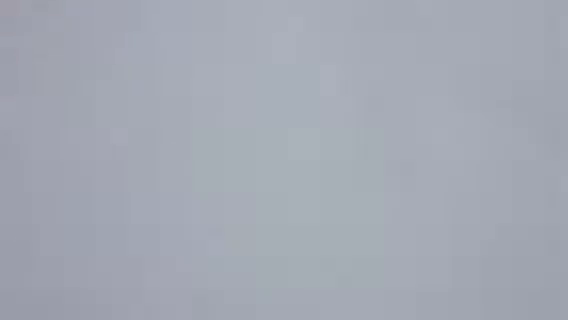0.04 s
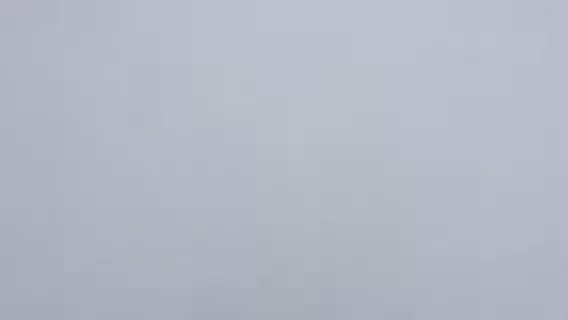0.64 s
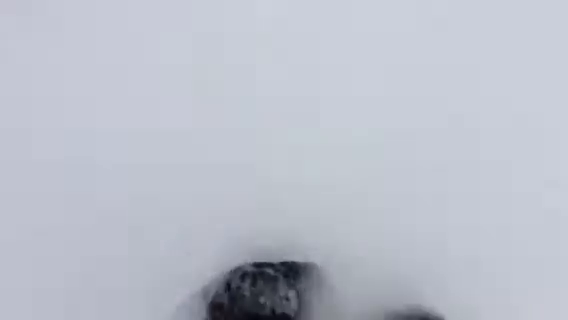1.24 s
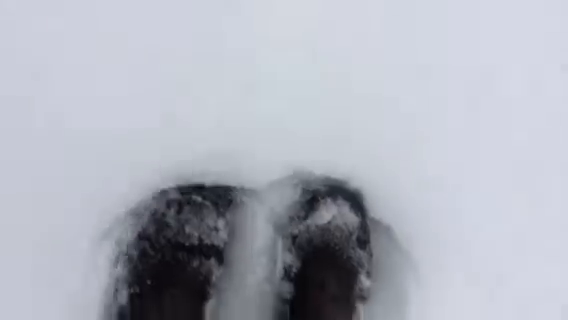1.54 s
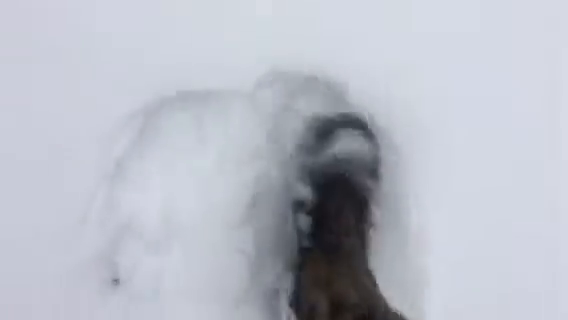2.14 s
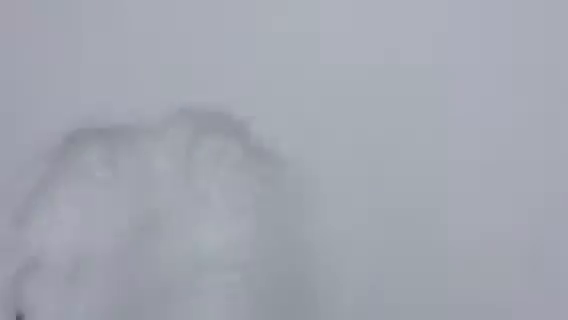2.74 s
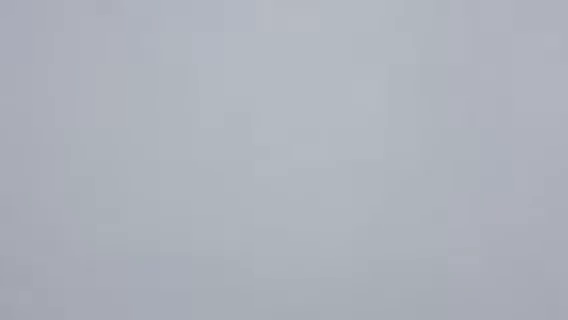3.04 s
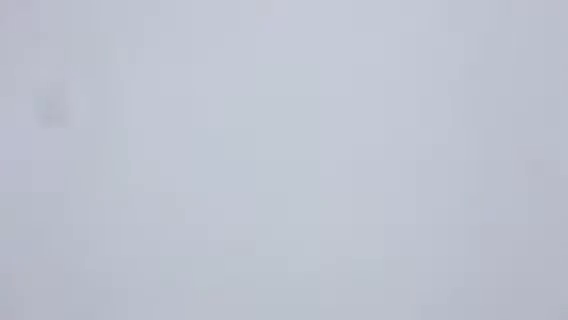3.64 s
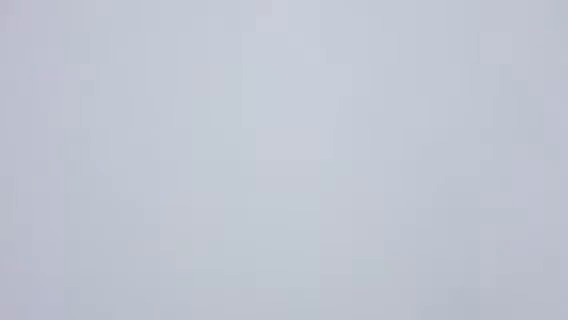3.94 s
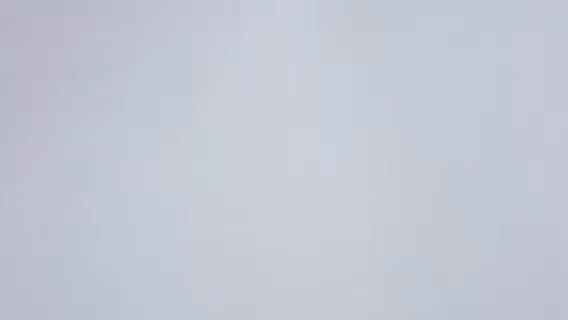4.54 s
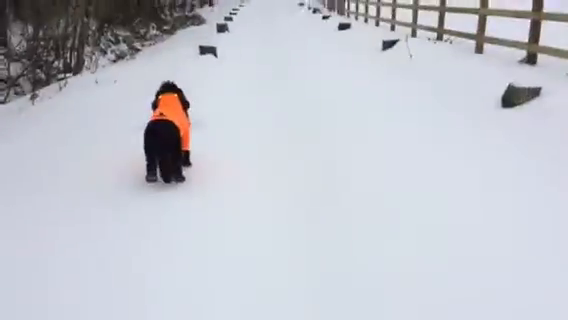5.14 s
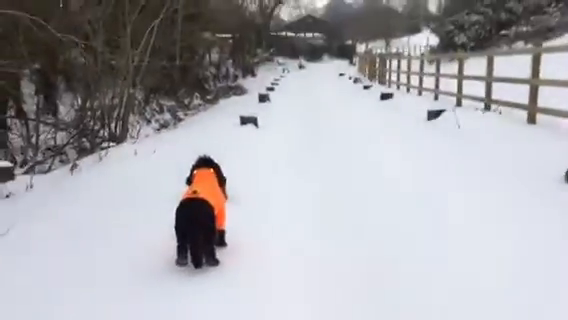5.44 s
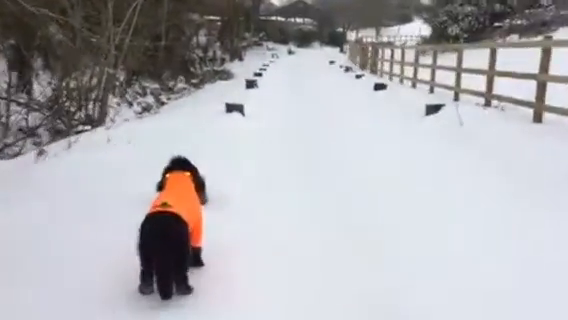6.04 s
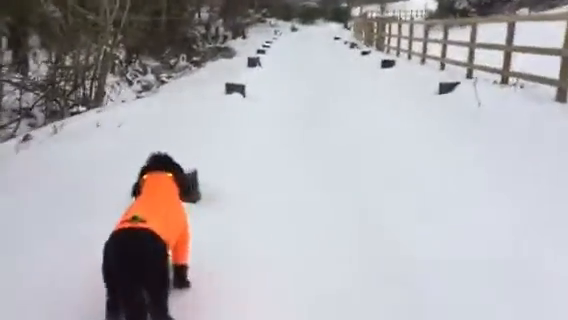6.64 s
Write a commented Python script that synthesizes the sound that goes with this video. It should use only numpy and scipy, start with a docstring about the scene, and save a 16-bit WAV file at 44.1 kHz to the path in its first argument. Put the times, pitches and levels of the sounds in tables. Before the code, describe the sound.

Close, uneven footsteps crunch through an icy snow crust, roughly one every two thirds of a second. The snow creaks and packs with low thuds, while small scuffs and sharp ticks fill the gaps. The handheld microphone rumbles softly and picks up muffled bumps, more so from the middle on. The open air is quiet and has no echo, with barely audible birds far away later on.

```python
"""Boots in crusted snow

A walker in open snow, heard close up from a phone held above the boots. Under each step the crust gives
way in bursts of tiny fractures while the snow below creaks and packs with a dull thud. Between steps
crumbs snap and slide, the handheld phone rumbles softly, and far birds whistle faintly."""
import sys
import numpy as np
from scipy import signal
from scipy.fft import rfft, irfft
from scipy.io import wavfile
from scipy.ndimage import uniform_filter1d

SR = 44100
rng = np.random.default_rng(int(sys.argv[2]) if len(sys.argv) > 2 else 0)


def transcribe(u):
    """Save the signal u as a 16-bit wav file named by the first command-line argument.

    u: samples, shape (n,) or (channels, n), limited to [-1, 1]; the rate is SR.
    q: integer samples, one column per channel.
    """
    v = np.clip(np.atleast_2d(u).T, -1, 1)
    q = np.round(v * 32767).astype(np.int16)
    wavfile.write(sys.argv[1], SR, q)


N = 299880


def undb(db):
    """Decibels to gain."""
    return 10 ** (np.asarray(db) / 20)


def curve(table):
    """A table of times and values, interpolated at every sample."""
    return np.interp(np.arange(N) / SR, *np.transpose(table))


def add(track, start_s, sound):
    """Mix a sound into a track."""
    i = int(np.clip(start_s * SR, 0, N - 1))
    track[i:i + len(sound)] += sound[:N - i]


def wander(rate_hz):
    """Random levels, each held for one period, then smoothed twice; spread near 1."""
    hold = int(SR / rate_hz)
    levels = np.repeat(rng.standard_normal(N // hold + 1), hold)
    return 1.3 * uniform_filter1d(uniform_filter1d(levels, hold), hold)[:N]


def envelope(t, attack_s, hold_s, release_s):
    """Rise, hold and die away."""
    rise = np.clip(t / max(attack_s, 1 / SR), 0, 1)
    return rise * np.exp(-np.maximum(t - attack_s - hold_s, 0) / release_s)


def match_energy(x, shape):
    """Scale a sound to carry the energy of an envelope."""
    return x * np.sqrt(np.sum(shape ** 2) / np.sum(x ** 2))


def colour(x, spectrum):
    """Minimum-phase filter through (Hz, dB) points; white noise keeps its level."""
    size = 8192
    hz, db = np.transpose(spectrum)
    bins_hz = np.arange(size // 2 + 1) * SR / size
    gain = undb(np.interp(np.log(bins_hz + 1), np.log(hz), db))
    cepstrum = irfft(np.log(gain / np.sqrt(np.mean(gain ** 2))))
    cepstrum[1:size // 2] *= 2
    cepstrum[size // 2 + 1:] = 0
    return signal.oaconvolve(x, irfft(np.exp(rfft(cepstrum))))[:N]


# Outdoor air all around the microphone: frequency_hz, gain_db
AIR_SPECTRUM = [(30, -1), (200, 5), (700, 9.5), (1500, 3), (4000, -2), (7000, -9), (9500, -16),
                (11000, -34.5), (16000, -12.5)]


def air():
    """A faint, steady hush over the snow."""
    return undb(-66) * colour(rng.standard_normal(N), AIR_SPECTRUM)


# Birds far from the microphone: start_s, length_s, start_hz, end_hz, level_db
BIRD_CALLS = [(3.74, .14, 2000, 1870, -67), (5.04, .12, 3200, 2950, -68), (5.54, .07, 7150, 6850, -67),
              (5.62, .06, 6700, 6450, -65), (5.74, .06, 5450, 5100, -57), (5.785, .09, 5080, 5050, -61),
              (5.815, .06, 5750, 5600, -67)]


def birds():
    """Thin falling whistles, wavering on their way through the trees."""
    out = np.zeros(N)
    for start_s, length_s, start_hz, end_hz, level_db in BIRD_CALLS:
        hz = np.linspace(start_hz, end_hz, int(length_s * SR))
        hz *= 1 + 0.07 * uniform_filter1d(rng.standard_normal(len(hz)), size=100)
        whistle = np.sin(2 * np.pi * np.cumsum(hz) / SR)
        add(out, start_s, undb(level_db) * np.hanning(len(hz)) * whistle)
    return out


def thud(t, hz, shape, roughness):
    """A soft impact, as of snow packing in uneven jerks: low noise and a tone that falls through hz."""
    band = signal.butter(3, [.42 * hz, 1.7 * hz], "band", fs=SR, output="sos")
    noise = signal.sosfilt(band, rng.standard_normal(len(t)))
    jerks = match_energy(noise * shape, shape) / np.sqrt(2)
    sagging_hz = hz * (0.8135 + 0.55 * np.exp(-t / 0.011))  # more of the sole bears on the snow
    tone = shape * np.sin(2 * np.pi * np.cumsum(sagging_hz) / SR)
    return (roughness * jerks - tone) / np.sqrt(1 + roughness ** 2)


# Soft buffeting right at the handheld microphone: time_s, level_db
BUFFET_LEVELS = [(0, -61), (.13, -37.5), (.4, -42.5), (.6, -57.5), (1.0, -45.5), (1.3, -46), (1.92, -54.5),
                 (2.08, -33), (2.2, -47), (2.6, -74), (3.1, -38), (3.37, -55), (3.7, -35), (4.45, -38.5),
                 (5.2, -43.5), (6.25, -48), (6.42, -46), (6.8, -42)]
# The bass-heavy tone of that buffeting: frequency_hz, gain_db
BUFFET_SPECTRUM = [(20, -50.5), (35, -7), (55, 2.5), (80, 5.5), (130, -7), (220, -17), (350, -25),
                   (600, -40.5), (1200, -64.5)]
# Muffled bumps of boot and clothing, close by: start_s, level_db, pitch_hz
BODY_BUMPS = [(1.033, -33, 170), (1.18, -26.5, 98), (1.654, -40, 164), (2.098, -30.5, 205),
              (2.267, -30, 252), (2.33, -34.5, 342), (3.01, -25, 71), (3.147, -30, 126), (3.21, -22, 89),
              (3.237, -22.5, 135), (3.611, -20, 157), (3.683, -28.5, 145), (3.725, -39.5, 78.6),
              (3.784, -21.5, 119), (3.963, -21, 158), (4.243, -19, 137), (4.294, -22, 149),
              (4.492, -27, 158), (4.666, -23, 251), (5.036, -26, 80), (5.09, -31.5, 69.5),
              (0.418, -38, 67.5), (0.71, -41, 63), (6.301, -29.5, 74), (6.557, -31.5, 68),
              (5.149, -33.5, 70), (5.201, -32.5, 83), (5.374, -27, 121), (6.188, -31, 188),
              (6.26, -25, 149), (6.638, -23.5, 171), (6.7, -23.5, 163), (6.759, -21, 152)]


def handling(jolt):
    """The walker's sway and footfalls shake the phone: fluttering buffets and muffled bumps."""
    flutter_db = 4 * wander(rate_hz=17)
    buffets = undb(curve(BUFFET_LEVELS) + flutter_db) + jolt
    out = buffets * colour(rng.standard_normal(N), BUFFET_SPECTRUM)
    t = np.arange(SR // 6) / SR
    swell_s = 0.0071
    shape = t / swell_s * np.exp(1 - t / swell_s)
    for start_s, level_db, pitch_hz in BODY_BUMPS:
        add(out, start_s, undb(level_db) * thud(t, pitch_hz, shape, roughness=1.0))
    return out


def fractures(size, per_s, spread_db):
    """Energies of tiny fractures at random moments, many small and a few large; mean 1."""
    breaks = rng.random(size) < per_s / SR
    strength_db = spread_db * np.clip(rng.standard_normal(size), -2, 2)
    energy = breaks * undb(strength_db) ** 2 + 1e-12
    return energy / energy.mean()


def crackle(energy, ring_s):
    """Each fracture rings as its own very short noisy crack."""
    decay = np.exp(-1 / (ring_s * SR))
    ringing = signal.lfilter([1 - decay], [1, -decay], energy)
    return np.sqrt(ringing) * rng.standard_normal(len(energy))


def shimmer(x, depth_db):
    """Each band swells and dips on its own, so a scrape keeps changing colour."""
    out = 0
    for edge_hz in (1500, 3000, 6000, 11000):
        below = signal.sosfiltfilt(signal.butter(2, edge_hz, fs=SR, output="sos"), x)
        out = out + below * undb(depth_db * wander(rate_hz=30))
        x = x - below
    return out + x


# A boot drags or sinks in loose snow below the microphone: peak_s, swell_s, fade_s, crust_db, ice_db
BOOT_DRAGS = [(0.12, 0.024, 0.011, -46.5, -56), (0.31, 0.041, 0.1, -48, -50.5),
              (0.914, 0.023, 0.015, -33, -32.5), (0.99, 0.045, 0.022, -36.5, -41.5),
              (0.62, 0.045, 0.083, -65.5, -103), (1.139, 0.11, 0.059, -51.5, -51),
              (1.508, 0.063, 0.049, -38, -37), (1.669, 0.043, 0.083, -49.5, -47),
              (1.79, 0.017, 0.27, -52.5, -49), (1.97, 0.032, 0.063, -35.5, -34.5),
              (2.06, 0.032, 0.099, -39, -42.5), (2.28, 0.077, 0.092, -46.5, -41.5),
              (2.49, 0.011, 0.15, -56.5, -51), (2.63, .015, 0.071, -40.5, -41),
              (3.0, 0.062, 0.1, -48, -48.5), (3.261, 0.025, 0.084, -53.5, -54.5),
              (3.622, .02, 0.022, -48.5, -57.5), (5.33, 0.028, 0.049, -69.5, -94),
              (4.272, 0.11, 0.066, -40.5, -43), (4.70, 0.039, 0.12, -37.5, -37),
              (5.57, .05, 0.12, -60, -58.5), (5.885, .015, 0.013, -45, -56.5),
              (6.04, 0.039, 0.04, -38, -41.5), (6.638, 0.028, 0.016, -57.5, -60.5),
              (6.76, 0.036, 0.057, -41, -43.5)]


def scuffs():
    """Loose grains and crumbs patter round the moving boot while the sole pushes snow with a low rub."""
    def catching():
        """The gain wavers as the boot catches and lets go."""
        return undb(0.5 * wander(rate_hz=40))

    t = np.arange(N) / SR
    crust, ice = undb(-72.5), undb(-68)  # grains that never quite settle
    for peak_s, swell_s, fade_s, crust_db, ice_db in BOOT_DRAGS:
        width_s = np.where(t < peak_s, swell_s, fade_s)
        stroke = np.exp(-((t - peak_s) / width_s) ** 2)
        crust = crust + undb(crust_db) * stroke
        ice = ice + undb(ice_db) * stroke
    rub_band = signal.butter(2, (124, 287), "band", fs=SR, output="sos")
    rub = signal.sosfilt(rub_band, rng.standard_normal(N))
    rub *= crust * undb(-1) * catching() / rub.std()
    grains = fractures(N, per_s=1300, spread_db=2)
    crumbs = fractures(N, per_s=110, spread_db=4.5)
    energy = .7 * grains + .4 * crumbs
    crust, ice = crust * catching(), ice * catching()
    return crust * crackle(energy, ring_s=.0007), ice * crackle(energy, ring_s=.001), rub


# The loudest single snaps of crust at the walker's feet: start_s, crust_db, ice_db, pitch_hz
CRUST_SNAPS = [(0.265, -17.5, -34, 835), (0.309, -26.5, -35, 654), (0.443, -29.5, -49, 973),
               (0.922, -20, -27, 1800), (0.965, -20, -28, 820), (1.463, -10.5, -33, 666),
               (1.494, -15.5, -41, 1150), (1.506, -22, -28, 614), (1.529, -25, -21, 670),
               (1.547, -29, -46, 640), (1.659, -32, -46, 705), (1.827, -31.5, -29, 645),
               (2.03, -16.5, -34, 1115), (2.05, -24, -18, 540), (2.142, -30.5, -36.5, 720),
               (2.329, -34.5, -23.5, 575), (2.487, -36, -36, 1020), (2.606, -18, -12.5, 1290),
               (2.873, -20.5, -29.5, 558), (2.974, -24.5, -26, 564), (3.067, -40, -19.5, 2820),
               (3.536, -14, -22, 624), (3.679, -32, -33.5, 880), (3.897, -34, -26.5, 958),
               (3.914, -35, -31, 900), (4.012, -34.5, -40, 610), (4.165, -16.5, -12.5, 616),
               (4.541, -40.5, -31, 687), (4.61, -38, -36, 525), (2.707, -38, -31.5, 640),
               (4.833, -22.5, -23, 480), (4.84, -19, -18.5, 2180), (4.963, -53, -22.5, 780),
               (5.547, -35, -30, 586), (5.709, -33.5, -26.5, 2680), (3.474, -23, -22, 690),
               (4.414, -34, -49.5, 614), (4.748, -17, -40, 1080), (5.453, -18, -26, 1270),
               (1.281, -52, -42, 900), (1.779, -34, -29, 2170), (6.369, -47.5, -59, 1230),
               (6.094, -15.5, -38, 930), (6.166, -28, -41, 654), (6.263, -33, -40.5, 536)]


def snaps():
    """Lone cracks: a sharp tick that crumbles away and the short pop of the hollow under the crust."""
    crust, ice = np.zeros((2, N))
    t = np.arange(SR // 30) / SR
    for start_s, crust_db, ice_db, pitch_hz in CRUST_SNAPS:
        pop = np.exp(-t * pitch_hz / 1.5) * np.sin(2 * np.pi * pitch_hz * t)
        breaking = np.exp(-t / .0008) + undb(-17) * np.exp(-t / .005)
        tick = breaking * rng.standard_normal(len(t))
        add(crust, start_s, undb(crust_db) * (tick + .5 * pop))
        add(ice, start_s, undb(ice_db) * breaking * rng.standard_normal(len(t)))
    return crust, ice


# Resonances of the packed snow right under the sole: pitch_hz, level_db
SNOW_MODES = [(640, 4), (800, -6), (920, 1), (1080, 1.5), (1320, -6)]


def creak(t, shape, slip_hz):
    """Packed snow sticks and slips; every slip rings it briefly, each time in a different mix."""
    timing, *strengths = rng.standard_normal((80, 1 + len(SNOW_MODES))).T
    slip_times_s = np.cumsum(np.exp(0.3914 * timing)) / slip_hz
    ring = 0
    for (pitch_hz, level_db), strength in zip(SNOW_MODES, strengths):
        gains = undb(level_db + 5.1 * strength)
        slips, _ = np.histogram(slip_times_s, len(t), (0, t[-1]), weights=gains)
        ring = ring + signal.lfilter(*signal.iirpeak(pitch_hz, Q=6, fs=SR), slips * shape)
    return match_energy(ring, shape)


# Heel, sole and toe break the crust in quick succession, close below the microphone:
# start_s, attack_s, hold_s, crunch_db, ice_db, thud_db, thud_hz
BOOT_CRUNCHES = [ (0.147, .004, 0.0031, -41.5, -36.5, -22, 176),
                 (0.16, .005, 0.033, -33.5, -32.5, -21, 220),
                 (0.224, 0.0043, 0.022, -28.5, -28.5, -17.5, 139),
                 (0.255, 0.0075, 0.014, -24.5, -27.5, -9.5, 141),
                 (0.811, 0.0031, 0.032, -30, -28.5, -14, 192), (0.919, 0.0013, 0.019, -27, -24.5, -10, 127),
                 (0.957, 0.0041, 0.0044, -31.5, -28, -10.5, 211),
                 (1.428, 0.0013, 0.013, -23.5, -23, -12.5, 202),
                 (1.455, 0.0031, 0.016, -28, -27, -7.5, 197.5), (2.043, 0.01, 0.022, -37, -34, -16.5, 159),
                 (2.423, .005, .004, -36.5, -34.5, -34.5, 182),
                 (2.468, 0.0011, 0.0018, -36.5, -36, -39, 172.7),
                 (2.579, 0.0027, 0.015, -28.5, -32, -18, 231),
                 (2.604, 0.0028, 0.0067, -30, -19.5, -12, 171),
                 (2.834, 0.0071, 0.037, -42.5, -41.5, -35, 204), (2.902, 0.0022, .002, -38, -38, -33, 380),
                 (2.915, 0.0045, 0.011, -37, -37, -30.5, 250),
                 (2.96, 0.0045, 0.0036, -38.5, -39.5, -27, 268),
                 (3.046, 0.0051, 0.0052, -33, -35.5, -30.5, 305),
                 (3.281, 0.0079, 0.023, -39, -39.5, -30, 270),
                 (3.423, 0.0037, 0.0023, -36, -34.5, -20, 156),
                 (3.438, 0.0047, 0.013, -31, -30.5, -12, 156), (3.475, 0.0063, 0.031, -31, -33, -24, 243),
                 (3.512, 0.0022, 0.0084, -21.5, -28, -9.5, 161),
                 (3.53, 0.0054, .011, -19.5, -27, -28.5, 170), (3.548, 0.0033, 0.0053, -21, -26, -3, 164),
                 (3.584, 0.0023, 0.0024, -26.5, -29, -13, 149), (3.896, 0.003, 0.02, -45, -51.5, -18, 184),
                 (4.091, 0.0017, 0.024, -36, -31.5, -26, 195), (4.107, .003, 0.0045, -25, -23, -18, 217),
                 (4.15, 0.0019, 0.014, -30.5, -29.5, -15.5, 177),
                 (4.17, 0.0024, 0.025, -31.5, -32, -9, 171), (4.388, 0.0076, 0.0078, -43, -48, -33, 186),
                 (4.623, .008, 0.027, -39, -46.5, -18, 257.5),
                 (4.715, 0.0066, 0.036, -29, -37.5, -9.5, 126.6),
                 (4.765, 0.016, 0.046, -28.5, -32.5, -9.5, 131),
                 (4.942, 0.012, 0.0078, -36, -40.5, -23, 134),
                 (5.387, 0.0046, 0.032, -33.5, -31.5, -25, 188),
                 (5.445, 0.0043, 0.0086, -30, -34.5, -12.5, 193),
                 (5.469, 0.0068, 0.025, -36.5, -41.5, -12.5, 134.3),
                 (5.587, 0.0044, 0.0075, -37.5, -36, -25, 151),
                 (5.957, 0.0034, 0.046, -44, -46, -22.5, 201.5),
                 (6.056, 0.0021, 0.0099, -30, -36, -10.5, 124),
                 (6.081, 0.0027, 0.021, -31.5, -38, -9.5, 127),
                 (6.112, 0.0016, 0.023, -30.5, -39.5, -17, 146),
                 (6.13, 0.0016, 0.037, -33.5, -36.5, -18.5, 162),
                 (6.725, 0.0021, 0.01, -32, -29.5, -22.5, 200), (6.777, 0.016, .02, -37, -35, -20.5, 184)]


def steps():
    """A boot loads the crust until it bursts; crumbs trickle, the snow packs and the phone is jolted."""
    crust, ice, thuds, jolt = np.zeros((4, N))
    t = np.arange(SR // 3) / SR
    thud_lag_s = 0.00297  # the packing snow follows the breaking crust
    for start_s, attack_s, hold_s, crunch_db, ice_db, thud_db, thud_hz in BOOT_CRUNCHES:
        load = envelope(t, attack_s, hold_s, release_s=0.0075)
        crumbs = undb(-27.5) * envelope(t, attack_s, hold_s, release_s=.07)
        breaking = load + crumbs
        energy = fractures(len(t), per_s=1100, spread_db=7) * breaking ** 2
        cracks = match_energy(crackle(energy, ring_s=0.00064), breaking)
        icy_cracks = match_energy(crackle(energy, ring_s=0.0014), breaking)
        add(ice, start_s, undb(ice_db) * icy_cracks)
        # the harder the snow is pressed and the less icy it is, the more of its noise is creak
        pressure_db, dullness_db = crunch_db + 24, crunch_db - ice_db - 7
        creak_gain = undb(-5 + .25 * pressure_db + .7 * dullness_db)
        squeak = creak_gain * creak(t, load, slip_hz=219.8)
        add(crust, start_s, undb(crunch_db) * (cracks + squeak) / np.hypot(1, creak_gain))
        landing = 1 + 0.42 * np.exp(-t / 0.0098)  # heaviest as the weight first lands
        packing = envelope(t, attack_s, hold_s, release_s=0.0086) * landing
        add(thuds, start_s + thud_lag_s, undb(thud_db) * thud(t, thud_hz, packing, roughness=0.75))
        add(jolt, start_s, undb(thud_db - 18) * envelope(t, attack_s, hold_s, release_s=0.022))
    return crust, ice, thuds, jolt


# The body of breaking crust at close range: frequency_hz, gain_db
CRUST_SPECTRUM = [(200, 2), (360, 8.5), (490, -0.5), (640, 0.5), (900, 1), (1300, 0), (1800, -1),
                  (2700, -1), (3800, -10.5), (7000, -27.5)]
# Its icy treble: frequency_hz, gain_db
ICE_SPECTRUM = [(1500, -26.5), (2600, -12), (3300, 0), (4200, 0.5), (5000, -2), (5800, 1), (7300, -2),
                (9300, 0), (10400, -5), (12000, -4), (15800, -7.5)]
# The highest treble, strongest while the microphone faces the boots: time_s, gain_db
MIC_FACING = [(0, -2.5), (1.5, -1.5), (2.6, -3), (3.5, -5.5), (4.15, -3.5), (4.75, -11), (5.5, -17),
              (6.1, -8.5), (6.8, -11)]


def snow_tone(crust, ice):
    """All cracks share the colours of crust and ice; the sparkle dulls as the phone turns away."""
    crust, ice = colour(crust, CRUST_SPECTRUM), colour(ice, ICE_SPECTRUM)
    sparkle = signal.sosfiltfilt(signal.butter(2, 8000, "high", fs=SR, output="sos"), ice)
    return crust + ice + (undb(curve(MIC_FACING)) - 1) * sparkle


def scene():
    """Near boots and far birds at one microphone; open snow returns no echo."""
    step_crust, step_ice, thuds, jolt = steps()
    snap_crust, snap_ice = snaps()
    scuff_crust, scuff_ice, rub = scuffs()
    crust = step_crust + snap_crust + scuff_crust
    ice = step_ice + snap_ice + shimmer(scuff_ice, depth_db=2.5)
    return (air() + handling(jolt) + birds() + rub + thuds + snow_tone(crust, ice))[None]


def record(dry):
    """The phone thins the deep bass, rounds the loudest peaks and cuts the top."""
    low_cut = signal.butter(2, 42, "high", fs=SR, output="sos")
    high_cut = signal.ellip(10, .2, 80, 15900, fs=SR, output="sos")
    ceiling = .9
    rounded = ceiling * np.tanh(signal.sosfilt(low_cut, dry) / ceiling)
    return signal.sosfilt(high_cut, rounded)


dry = scene()
out = record(dry)
transcribe(out)
```